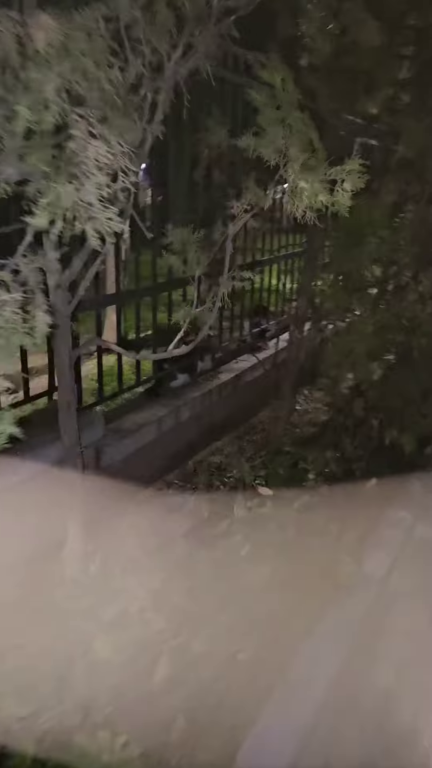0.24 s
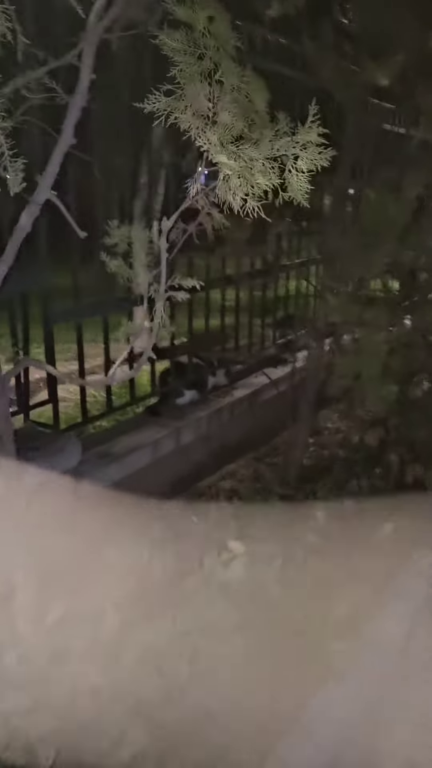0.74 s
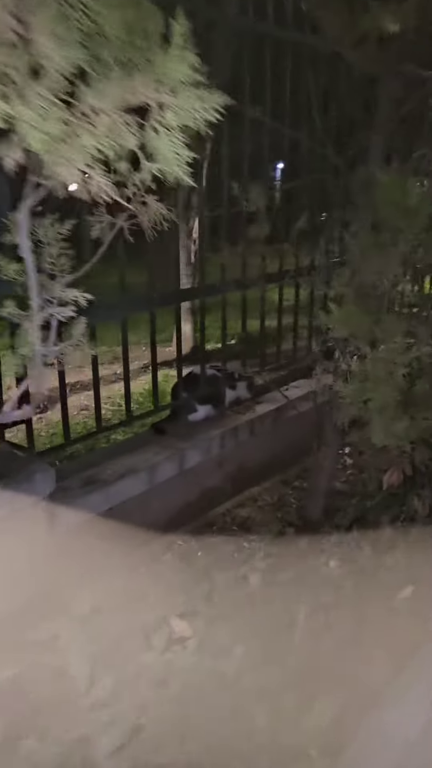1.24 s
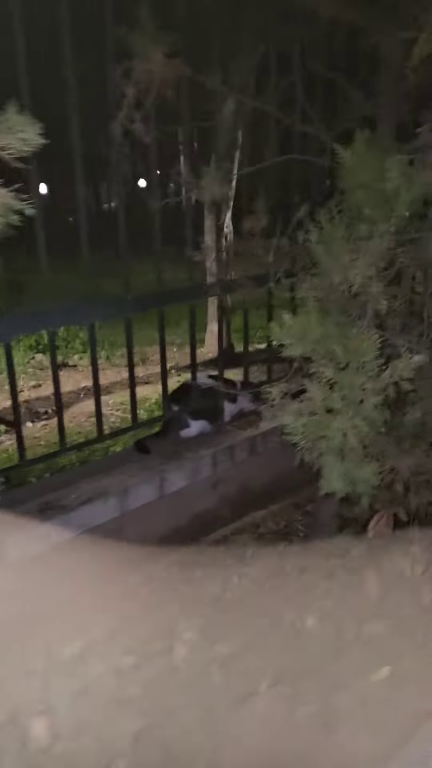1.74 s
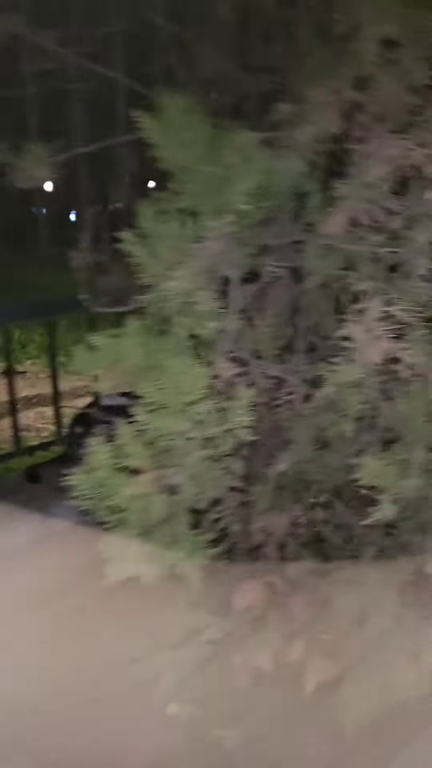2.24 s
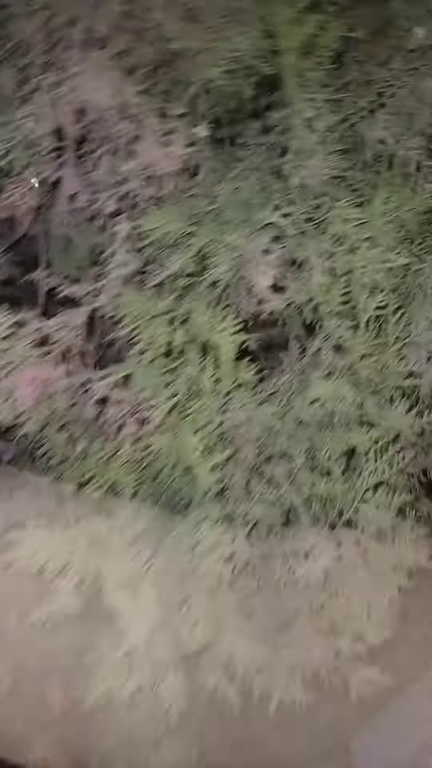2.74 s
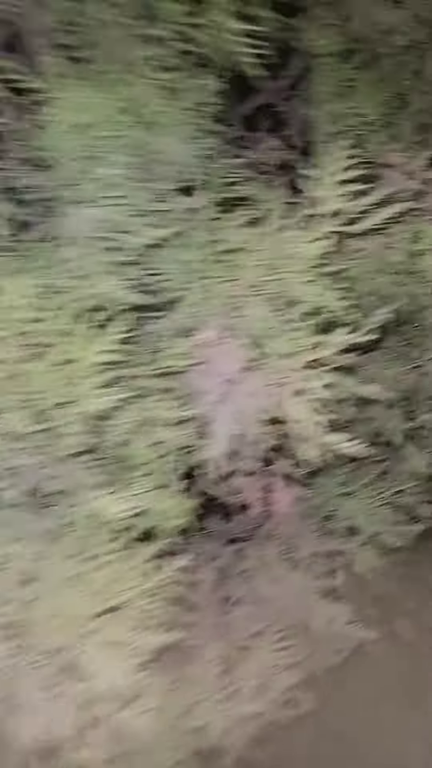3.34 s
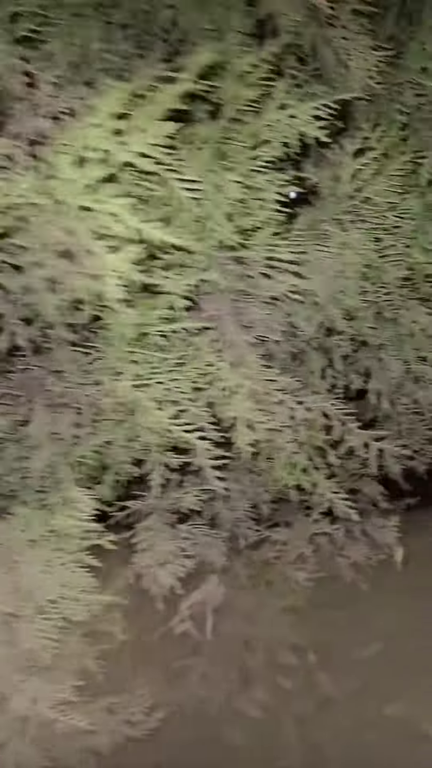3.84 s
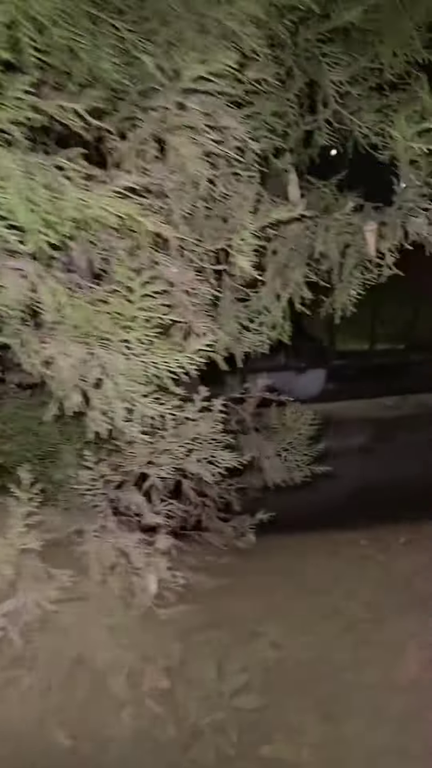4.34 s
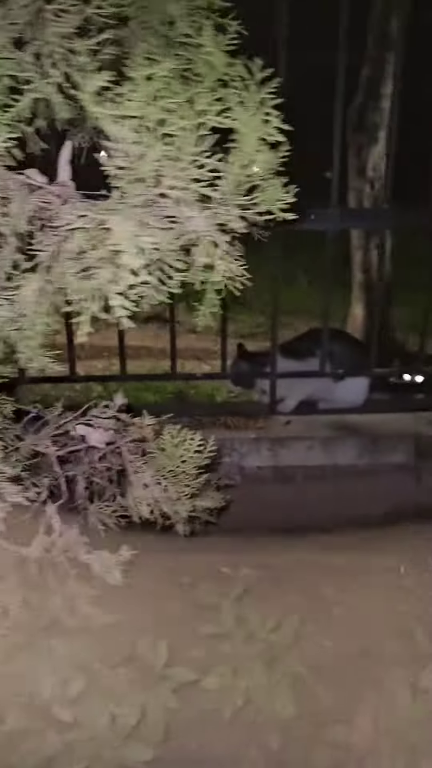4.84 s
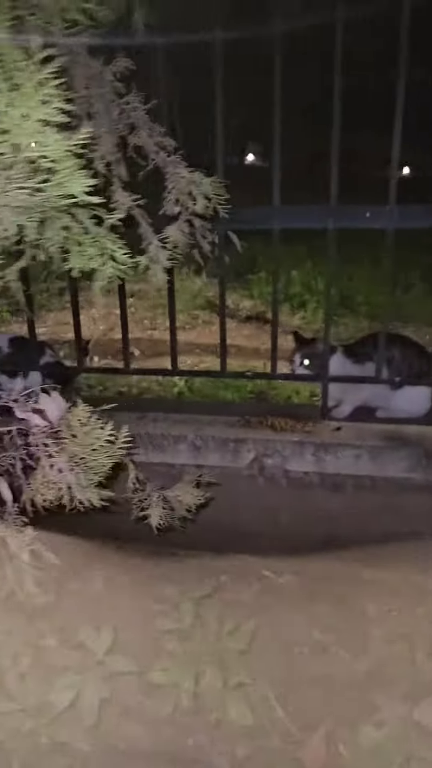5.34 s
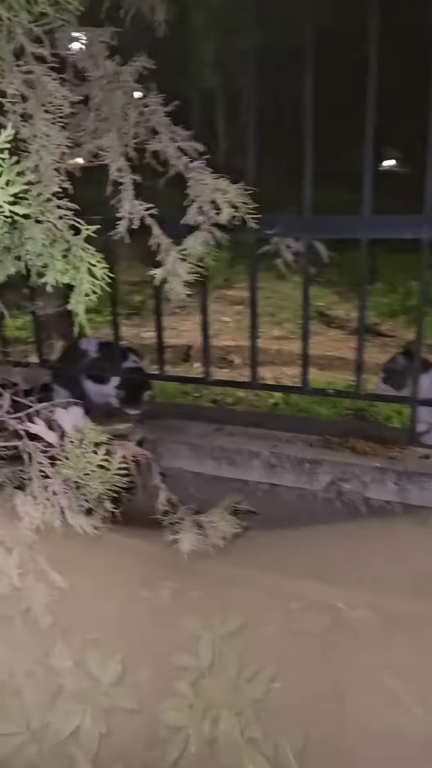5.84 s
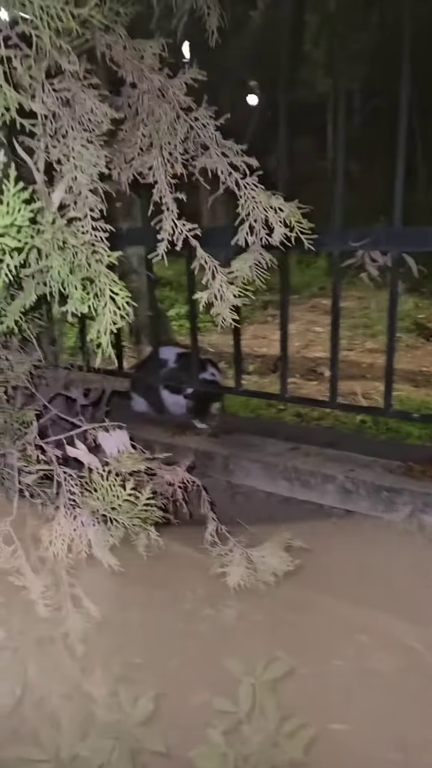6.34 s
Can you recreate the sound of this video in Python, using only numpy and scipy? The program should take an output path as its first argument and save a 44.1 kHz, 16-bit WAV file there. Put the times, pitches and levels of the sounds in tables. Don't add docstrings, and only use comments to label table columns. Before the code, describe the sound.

Outdoors beside a hedge, a continuous distant road roar dominates, bass-heavy, with blurred engine swells and a quiet repeating machine hum. The carried microphone picks up very faint finger rubbing and dry twig scratches, mostly on the right. Brief taps cluster around two and a half seconds, one centred snap follows, and isolated knocks come later. The far hiss and whine grow duller in the second half.

```python
import sys
import numpy as np
from scipy import signal
from scipy.fft import rfft, irfft, next_fast_len
from scipy.io import wavfile
from scipy.ndimage import uniform_filter1d

SR = 44100
rng = np.random.default_rng(int(sys.argv[2]) if len(sys.argv) > 2 else 0)


def natural_amplitude(level_db):
    exponent = np.asarray(level_db, float) / 20
    return 10 ** exponent


def master(y):
    cut = np.clip(np.atleast_2d(y).T, -1, 1)
    pcm = np.round(cut * 32767)
    wavfile.write(sys.argv[1], SR, pcm.astype(np.int16))


N = 290029


def evened(x):
    return x / np.sqrt(np.mean(x ** 2) + 1e-20)


def read(points, hz):
    f, value = np.transpose(points)
    return np.interp(np.log(hz + 1), np.log(f + 1), value)


def curves(rows, t):
    s, *columns = np.transpose(rows)
    return [np.interp(t, s, column) for column in columns]


def add(mix, s, sound):
    part = mix[:, round(s * SR):][:, :sound.shape[1]]
    part += sound[:, :part.shape[1]]


def coloured(x, colour_db):
    length = x.shape[-1]
    size = next_fast_len(length)
    gain = natural_amplitude(colour_db(np.fft.rfftfreq(size, 1 / SR)))
    return irfft(rfft(x, size) * gain, size)[..., :length]


def click(db, hz, ring_ms, pan_db, lag_ms, sag=.031):
    lag_s = np.array([[lag_ms], [0]]) / 1000
    t = np.maximum(np.arange(900) / SR - lag_s, 0)
    u = t * 1000 / ring_ms
    shape = (u / 2) ** 2 * np.exp(2 - u)
    level = natural_amplitude(db) * natural_amplitude(np.array([[pan_db], [0]]))
    return level * shape * np.sin(2 * np.pi * hz * t / (1 + sag * u))


# start in seconds, peak at the right in dB, pitch in Hz, ring in ms.
TAPS = [(2.3927, -24, 4600, 0.17), (2.3926, -30, -7900, .16), (2.3926, -44, 14500, .1),
        (2.3926, -42, 11500, .12), (2.3925, -33, 1900, 0.28), (2.3905, -44, 5700, .5),
        (2.3935, -40, 4600, .4), (4.4558, -47, 9600, .12), (4.4558, -46, 5600, .14),
        (4.4558, -50, 14000, .08), (4.4352, -41, 3500, .4), (4.4398, -38, 1300, .3),
        (2.5687, -40, 3400, 0.33), (2.5832, -30, 1000, .22), (2.5838, -21.5, -450, .55),
        (2.5838, -25, 230, 1.3), (4.4288, -28.5, 750, 0.36), (5.1097, -22, 750, .3),
        (5.1097, -28, 3100, 0.095), (5.1095, -31, 1300, .2), (5.396, -56, 11500, .1),
        (5.4587, -54, 12500, .1), (5.657, -33, 500, 0.39)]


def finger_taps(mix):
    for s, *knock in TAPS:
        add(mix, s, click(*knock, pan_db=-19, lag_ms=.33))


# start in seconds, peak at the right in dB, pitch in Hz, ring in ms.
SNAPS = [(2.9422, -38, 2200, 0.25), (2.9423, -51, 5400, 0.2), (3.1404, -34, 1500, 0.16),
         (3.1406, -46, 3600, .15), (3.1441, -36, 3200, .19), (3.1442, -16, 1230, .265),
         (3.1441, -29, 600, .5), (3.1462, -28.5, 1200, .3), (3.1442, -44, 5000, 0.24),
         (4.161, -40, 1200, .3), (4.369, -35, 1100, 0.37), (5.0278, -42, 1800, .2)]


def twig_snaps(mix):
    for s, *knock in SNAPS:
        add(mix, s, click(*knock, pan_db=-2, lag_ms=.4))


# start in seconds, peak at the right in dB, pitch in Hz,
# ring in ms, left minus right in dB.
FLICKS = [(2.3835, -50, 4700, .8, -16), (2.3875, -49, 3900, .5, -16), (2.3965, -48, 3600, .7, -16),
          (2.3995, -50, 4500, .6, -16), (2.5632, -47, 4500, .4, -16), (2.598, -51, 4300, .4, -2),
          (2.5995, -52, 3200, .6, 7), (2.9425, -51, 12700, .3, -8), (2.9425, -54, 10900, .3, -8),
          (3.1442, -56, 12200, .3, -20), (3.149, -62, 12000, .4, -16), (5.0277, -46, 4500, .28, -7),
          (5.0302, -46.5, 4450, .3, -7), (5.0278, -52, 3100, .25, -3), (2.9425, -52, 10600, .25, 4),
          (2.9425, -60, 14500, .2, 2), (2.3926, -46, 8400, .2, -3), (2.3926, -45, 12600, .12, -14),
          (1.873, -46, 2500, .3, -12), (3.1442, -52, 8100, .25, 0), (1.8735, -51, 12000, .3, -12),
          (1.8735, -53, 8600, .3, -12), (1.8805, -55, 11500, .3, -10), (3.815, -50, 4700, .6, -16),
          (5.7197, -52, 3000, .12, -2), (5.7197, -58, 6000, .12, -2)]


def needle_flicks(mix):
    for s, *knock in FLICKS:
        add(mix, s, click(*knock, lag_ms=.33, sag=.004))


def brush(draw, db, length, low_hz, pan_db, grain_db=2.6):
    t = np.arange(draw.shape[1]) / SR

    def tilt(f):
        octaves = np.log2(f / low_hz + 1)
        bass_cut = -20 * np.log10(1 + (low_hz / (f + 1)) ** 4)
        top_cut = -10 * np.log10(1 + (f / 14500) ** 10)
        return bass_cut - 13 * octaves + top_cut + np.outer([1, 0], pan_db - 5.0 * octaves)

    slips = natural_amplitude(grain_db * evened(uniform_filter1d(draw[0, ::-1], size=60)))
    shape = (1 - np.exp(-t / 0.00043)) * np.exp(-(t / length) ** 1.5)
    return natural_amplitude(db + 23.5) * coloured(draw, tilt) * slips * shape


# start in seconds, level in dB, length in seconds,
# lowest frequency in Hz, left minus right in dB.
BRUSHES = [(1.8728, -57, 0.0024, 7500, -12), (1.8795, -57, .003, 8500, -7), (2.389, -56, 0.012, 3400, -18),
           (2.516, -54, .002, 3500, -9), (2.557, -50, 0.0015, 5000, -18), (2.559, -47, 0.024, 1200, -18),
           (2.597, -54.5, 0.005, 2500, 3), (2.943, -56, .009, 11500, -8), (3.139, -64, .013, 11000, -16),
           (3.184, -68, .02, 8000, 3), (3.7915, -48, 0.022, 1200, -18), (3.797, -48, .018, 1500, -18),
           (3.813, -54, .014, 3000, -16), (4.4325, -55, 0.014, 3000, -18), (4.435, -53, .012, 2200, -18),
           (4.4565, -64, .002, 5000, -18), (5.0272, -60, .003, 10000, -12),
           (5.0315, -60, .0015, 11000, -12), (1.7434, -64, .002, 7000, 3), (1.8462, -66, .002, 7000, -3),
           (2.8205, -62, .003, 7500, -2), (2.563, -59, .002, 7500, -20), (2.564, -61, .026, 7800, -20),
           (3.794, -64, .014, 7500, -20), (4.432, -61, .013, 6500, -20), (4.428, -56, .003, 2800, -18),
           (1.896, -60, .002, 7500, -12), (3.15, -66, .04, 3500, 2), (3.785, -65, .08, 3500, 6),
           (2.548, -62, .012, 7000, 2), (4.4735, -58, .002, 3500, -14), (3.186, -60, .008, 4000, 2),
           (2.5735, -59, .0015, 6000, -20), (2.5795, -61, .002, 7500, -20), (2.607, -58, .002, 2500, 0),
           (4.4385, -61, .0015, 5500, -20), (4.4435, -60, .002, 4000, -20), (3.8055, -58, .0015, 6000, -20),
           (3.817, -60, .0015, 8000, -20), (5.031, -60, .002, 5000, -1)]


def twig_brushes(mix):
    draws = rng.standard_normal((len(BRUSHES), 2, 6000))
    for draw, (s, *scratch) in zip(draws, BRUSHES):
        add(mix, s, brush(draw, *scratch))


# frequency in Hz, level in dB.
RUB_COLOUR = [(2000, -34), (5000, -14), (8000, 2), (9700, -14), (11000, -3.5), (12600, 1), (15000, -6)]
# peak in seconds, level in dB, swell in seconds per 10 dB,
# fade in seconds per 10 dB.
STROKES = [(0.16, -78, .3, .5), (0.67, -77, .15, .06), (0.8, -79, .06, .4), (1.41, -77, .25, .1),
           (1.89, -72, .045, .1), (2.03, -78, .1, .3), (2.395, -77, .02, .12), (2.57, -72, .1, .07),
           (2.78, -80, .2, .2), (2.945, -76, .04, .08), (3.16, -80, .12, .4), (3.66, -78, .05, .2),
           (3.81, -75, .12, .1), (4.45, -75, .2, .025), (4.65, -84, .3, .4), (5.6, -85, .3, .3),
           (5.035, -77, .035, .03), (5.15, -80, .3, .12), (5.99, -86, .12, .2), (6.41, -88, .4, .3)]


def rubbing(leak_db=-24, grain_db=2.5):
    slips = rng.standard_normal((2, N)) * natural_amplitude(grain_db * rng.exponential(1, (2, N)))
    hiss = evened(coloured(slips, lambda f: read(RUB_COLOUR, f)))
    t = np.arange(0, N / SR, .002)
    strokes = 0
    for s, db, swell, fade in STROKES:
        fall_db = 10 * np.maximum((s - t) / swell, (t - s) / fade)
        strokes = strokes + natural_amplitude(db - fall_db) ** 2
    rest = natural_amplitude(-85 - .4 * t)
    press = np.sqrt(strokes + rest ** 2)
    pan = natural_amplitude(np.array([[leak_db], [0]]))
    return hiss * natural_amplitude(4.0) * np.interp(np.arange(N) / SR, t, press) * pan


# time in seconds, lead of the left port in ms,
# share of treble arriving directly (0-1), openness of the view in dB.
WALK = [
    (0, 0.076, 0.7, .8),
    (.7, 0.094, 0.3, 3.5),
    (1.3, .05, 0.5, 3),
    (2, 0.035, 0.74, 4.5),
    (2.95, .02, 0.4, 3),
    (3.4, 0.013, 0.1, -5),
    (4.2, 0.011, 0.54, -7),
    (5, 0.0084, 0.14, -8),
    (5.8, .01, 0.01, -9.5),
    (6.58, .01, 0.1, -7),
]
# time in seconds, turns per second.
SHAFT = [(0, 24.469), (2.5, 24.466), (3.5, 24.457), (6.58, 24.455)]
ORDERS = [1, 10, 22, 24, 32, 43, 64, 65, 77, 114, 124, 126, 127, 134, 136, 137, 138, 212, 215, 220]
ORDERS_DB = [-46.5, -58.5, -71.5, -68.5, -71.5, -82, -80, -88.5, -80, -84, -87, -87, -90, -87, -85, -76,
             -86, -97, -94, -94]
# centre in Hz, width in Hz, level in dB of ticks alike in every turn,
# level in dB of the loose rattle.
CASING = [(1860, 2500, -73, -91), (3320, 330, -83.5, -84), (5390, 280, -81, -79), (7400, 120, -83, -81),
          (10650, 800, -93, -85)]


def machine(tick_spread_db=5.5, beat=0.28, shimmer_db=1.4, sway_ms=.025):
    t = np.arange(N) / SR
    size = 1 << 15
    lead_ms, _, whine_db = curves(WALK, t)
    corner_db = 6 / (1 + np.exp((4.05 - t) / .1))
    hum_db = -4.5 - .3 * whine_db + corner_db

    rate = curves(SHAFT, t)[0]
    turns = np.cumsum(rate) / SR + np.array([rate * lead_ms / 1000, 0 * t])
    sway = evened(coloured(rng.standard_normal(N), lambda f: -20 * np.log10(1 + (f / 3) ** 2)))
    turns = turns + rate * sway_ms / 1000 * sway

    order = np.arange(size // 2 + 1)
    angle = rng.random(12)
    strength = natural_amplitude(tick_spread_db * rng.standard_normal(12))
    ticks = np.exp(-2j * np.pi * np.outer(order, angle)) @ strength

    phases = np.exp(2j * np.pi * rng.random(len(ORDERS)))
    tones = natural_amplitude(np.array(ORDERS_DB)) * phases * size / np.sqrt(2)
    hum, whine = np.zeros((2, len(order)), complex)
    hum[ORDERS[:3]] = tones[:3]
    whine[ORDERS[3:]] = tones[3:]
    hum, whine, rattle = irfft(hum), irfft(whine), 0

    for hz, width, tick_db, rattle_db in CASING:
        ring = lambda f: 1 / (1 + 2j * (f - hz) / width) ** 2
        whine = whine + natural_amplitude(tick_db) * evened(irfft(ticks * ring(order * rate[0])))
        band = coloured(rng.standard_normal((2, N)), lambda f: 20 * np.log10(abs(ring(f))))
        recede_db = -.9 * t * (hz / 1e4) ** 4
        rattle = rattle + natural_amplitude(rattle_db + recede_db) * evened(band)

    def play(turn):
        return np.interp(turns * size, np.arange(size), turn, period=size)

    rattle = rattle * (1 + beat * np.cos(2 * np.pi * turns))
    rattle = rattle * natural_amplitude(.4 * whine_db)
    air = evened(coloured(rng.standard_normal(N), lambda f: -20 * np.log10(1 + (f / 5) ** 2)))
    return natural_amplitude(hum_db) * play(hum) + natural_amplitude(whine_db + shimmer_db * air) * play(whine) + rattle


# peak in seconds, length in seconds,
# exhaust note in Hz, level in dB rms.
VEHICLES = [(.75, .35, 315, -53), (1.05, .15, 285, -52), (3.9, .15, 150, -48), (4.15, .15, 290, -54),
            (1.9, .4, 58, -47), (1.7, .15, 105, -45), (2.3, .14, 300, -51), (2.35, .35, 110, -47),
            (3.4, .25, 70, -43), (4.1, .2, 190, -52), (4.3, .2, 132, -47), (5.3, .2, 140, -49),
            (5.35, .15, 80, -46), (6.05, .25, 180, -53), (6.15, .3, 310, -56), (1.3, .2, 120, -45)]


def exhausts(width_hz=9):
    t, out = np.arange(N) / SR, 0
    draws = rng.standard_normal((len(VEHICLES), N // 40 + 2, 2))
    for draw, (s, length, hz, db) in zip(draws, VEHICLES):
        wobble = uniform_filter1d(draw, size=int(SR / 40 / width_hz), axis=0)
        wobble = evened(uniform_filter1d(wobble, size=30, axis=0))
        loudness, phase = np.repeat(wobble, 40, axis=0)[:N].T
        note = (1 + .6 * loudness) * np.cos(2 * np.pi * hz * t + .9 * phase)
        out = out + natural_amplitude(db) * evened(note) * np.exp(-((t - s) / length) ** 2)
    return out


# time in seconds, tyre roar in dB.
TYRES = [(0.0, -59), (0.42, -57), (0.69, -59), (3.39, -60), (3.5, -61), (5.46, -60), (5.66, -59),
         (6.58, -60)]
# time in seconds, level in dB.
ROAD = [(0.0, 0.5), (1.5, 0), (1.8, 0.5), (2.14, -2), (2.33, 1.5), (2.6, 0), (3.12, 0.5), (3.3, -2),
        (4.05, -1), (4.45, 0.3), (4.65, -1.5), (5.25, 2), (5.6, -0.3), (5.86, 2.5), (6.58, 1.5)]
# frequency in Hz, level in dB per Hz.
ROAD_COLOUR = [(12, -30), (20, -2.5), (55, -2), (126, -2), (186, -9), (342, -14.5), (416, -21),
               (1460, -29.5), (2610, -39), (3360, -41), (5860, -51.5), (7530, -52.5), (9680, -58),
               (10500, -65.5), (15500, -71.5)]
# centre in Hz, width in Hz, height in dB.
DRONES = [(55.2, 17.2, 4.5), (122.2, 22, 5), (272, 30, -.8), (338, 70, 1.7), (708, 103, 3.2),
          (1300, 300, .7), (4000, 450, -2.5), (5840, 310, -7.5)]
# frequency in Hz, left-right likeness (0-1).
SAME = [(60, 0.99), (130, 0.98), (290, 0.94), (640, 0.74), (1200, 0.44), (2000, 0.49), (3100, 0.77),
        (6800, 0.21), (15000, .01)]
# frequency in Hz, left minus right in dB.
LEAN = [(60, 1), (110, 0), (200, 1), (380, 0.5), (700, 0.0), (1290, 0.5), (2380, 1), (4400, 1.0), (8120, 5),
        (15000, 1.5)]


def traffic(patchy_db=0.86, gust_db=1.05):
    frames, hz = N // 256 + 5, np.fft.rfftfreq(1024, 1 / SR)
    a, b, c, d, patches = rng.standard_normal((frames, 513, 5)).T
    gusts = evened(uniform_filter1d(patches[0], size=5))
    patches = uniform_filter1d(patches, size=8, axis=0)
    patches = evened(uniform_filter1d(patches, size=14, axis=1))

    t = np.arange(frames) * 256 / SR
    swell_db = curves(ROAD, t)[0]
    lead_ms, direct, open_db = curves(WALK, t)
    roar_db = .15 * swell_db + .02 * open_db + .9 * curves(TYRES, t)[0]
    hiss_db = .36 * open_db
    rumble_db, roar_db, hiss_db = [x - x.mean() for x in (swell_db, roar_db, hiss_db)]

    octave = np.log2(hz + 1)[:, None]
    low = np.clip(np.log2(560) - octave, 0, 1)
    high = np.clip(octave - np.log2(1900), 0, 1)
    level_db = low * rumble_db + (1 - low - high) * roar_db + high * (hiss_db + gust_db * gusts)

    shaded = np.clip(octave - np.log2(800), 0, 1) * (1 - direct)
    same = np.clip(read(SAME, hz)[:, None] * (1 - shaded), 0, 1)
    late = np.exp(-2j * np.pi * hz[:, None] * lead_ms / 1000 * (1 - low))
    left = a + 1j * b
    right = same * late * left + np.sqrt(1 - same ** 2) * (c + 1j * d)
    spectra = np.array([left, right]) * natural_amplitude(level_db + patchy_db * patches)
    x = signal.istft(spectra, nperseg=1024, noverlap=768)[1][:, :N]

    def colour(f):
        humps = sum(db / (1 + (2 * (f - mid) / width) ** 2) for mid, width, db in DRONES)
        return read(ROAD_COLOUR, f) + humps + np.outer([.5, -.5], read(LEAN, f))

    return natural_amplitude(-35.2) * evened(coloured(x, colour))


# centre in Hz, width in Hz, depth in dB.
NOTCHES = [(9690, 940, -8.7), (11700, 1200, -2), (6900, 300, -1.5)]


def through_ports(x):
    return coloured(x, lambda f: sum(db * np.exp(-(2 * (f - hz) / width) ** 4) for hz, width, db in NOTCHES))


def scene():
    mix = traffic() + machine() + rubbing()
    twig_brushes(mix)
    mix = through_ports(mix)
    finger_taps(mix)
    twig_snaps(mix)
    needle_flicks(mix)
    return mix + exhausts()


# centre in seconds, depth in dB, width in seconds.
DIPS = [(2.65, 2.5, 0.037), (3.59, 6, 0.013), (4.03, 1, 0.014), (6.01, 5, 0.014)]


def noise_reducer(x):
    t = np.arange(N) / SR
    bite_db = sum(db * np.exp(-((t - s) / width) ** 2) for s, db, width in DIPS)
    treble = coloured(x, lambda f: -20 * np.log10(1 + (2500 / (f + 1)) ** 4))
    return x - treble * (1 - natural_amplitude(-bite_db))


def low_pass(x):
    return signal.sosfilt(signal.butter(12, 15725, fs=SR, output="sos"), x)


def record(dry):
    x = coloured(dry, lambda f: -10 * np.log10(1 + (39 / (f + 1)) ** 8))
    mix = noise_reducer(x)
    return low_pass(mix)


dry = scene()
out = record(dry)
master(out)
```